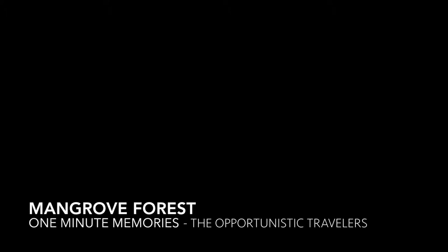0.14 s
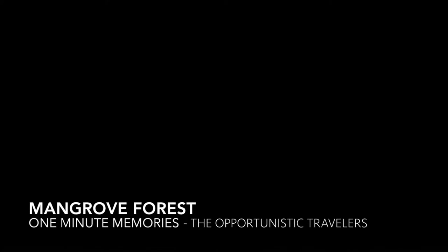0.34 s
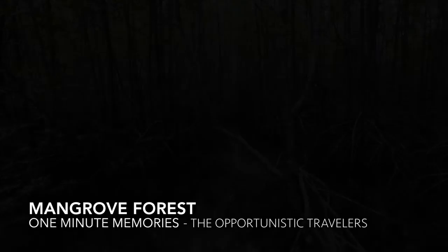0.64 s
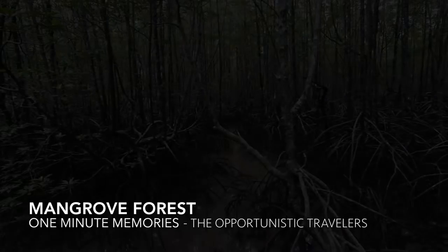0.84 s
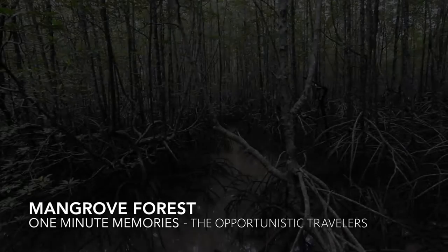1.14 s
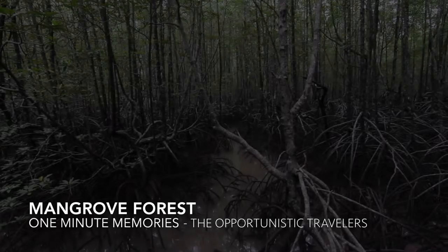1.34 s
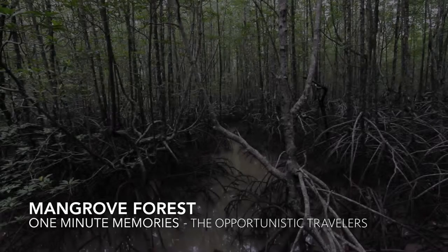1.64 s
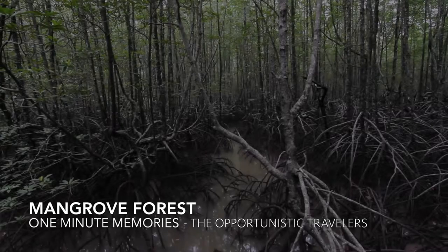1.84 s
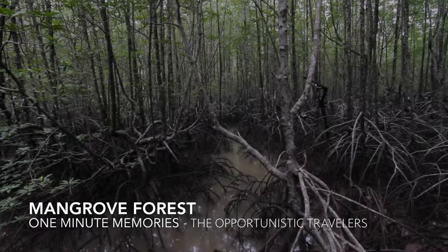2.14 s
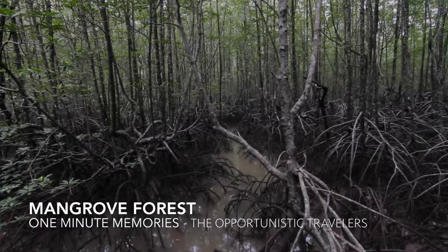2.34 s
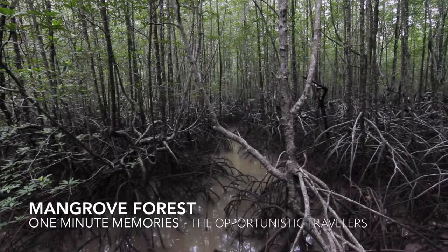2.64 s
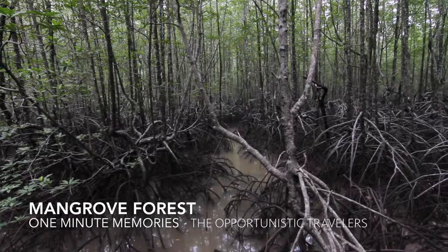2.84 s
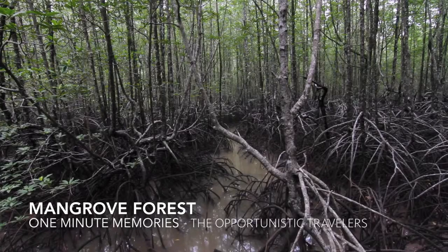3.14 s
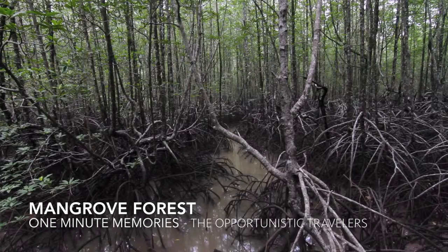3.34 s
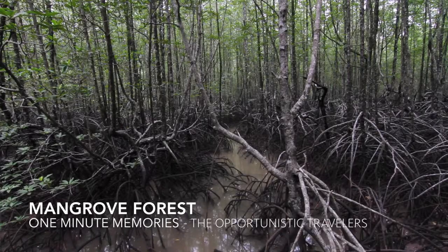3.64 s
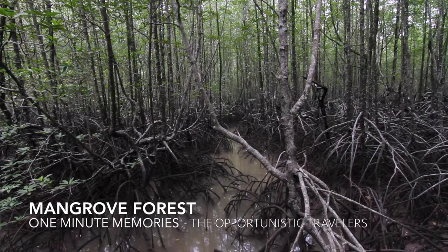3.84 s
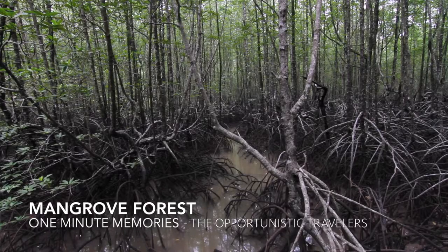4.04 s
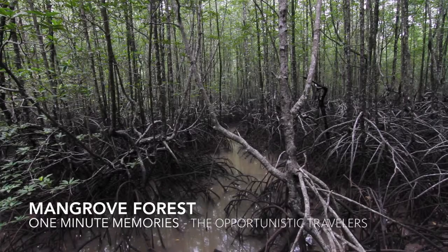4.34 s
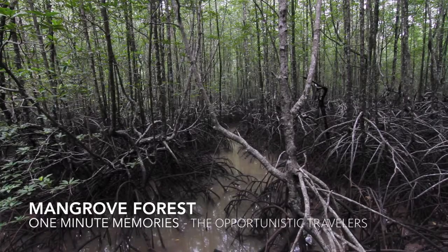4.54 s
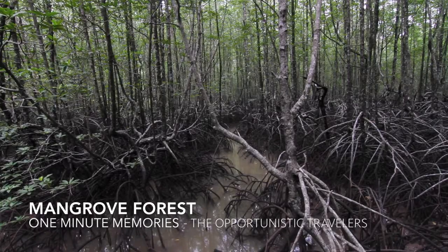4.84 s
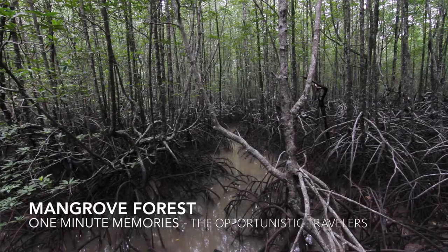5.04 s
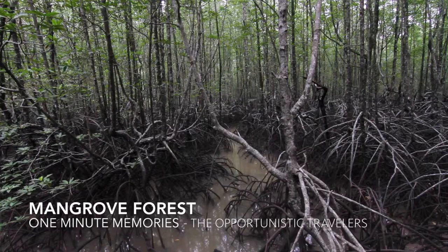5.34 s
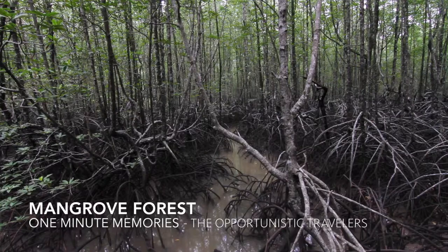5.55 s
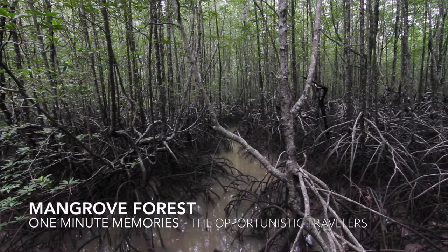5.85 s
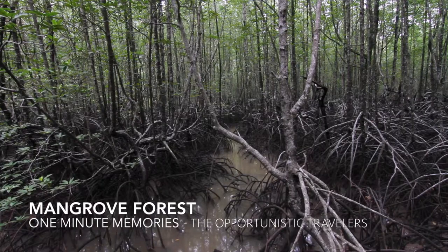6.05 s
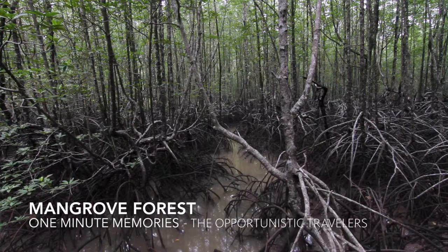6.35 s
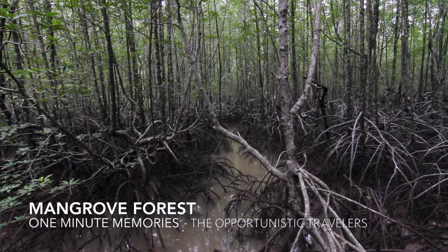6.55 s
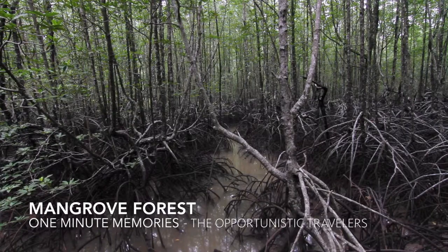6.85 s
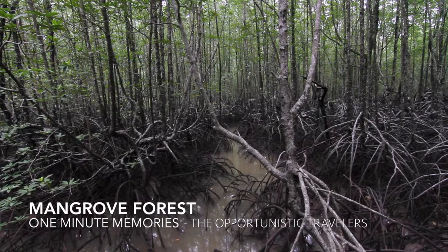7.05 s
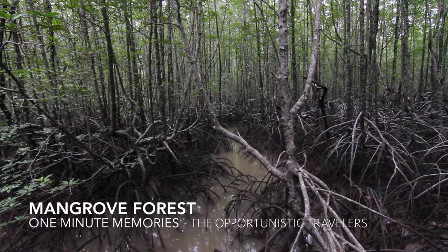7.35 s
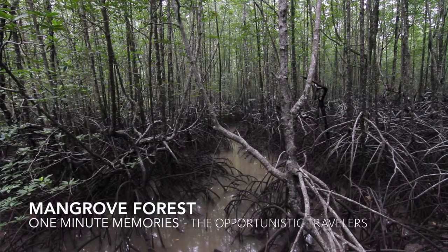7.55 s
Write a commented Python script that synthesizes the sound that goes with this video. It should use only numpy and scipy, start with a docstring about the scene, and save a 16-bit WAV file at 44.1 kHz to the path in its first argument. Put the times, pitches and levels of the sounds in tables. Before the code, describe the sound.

Outdoor insect ambience among dense trees and wet roots: a far, hissing cicada chorus with nearer groups buzzing in slightly different paces, blurred by echoes from the trunks. It fades in smoothly, one brighter close singer briefly standing out around two seconds, then stays steady. Very faint squeaks and rustles pass, a single dry snap occurs past the middle, and quiet handling thuds come last. The stationary microphone also catches weak low air rumble.

```python
"""Cicadas drone in a mangrove swamp; the sound fades in over a little more than two seconds.
Each near group is a few click trains at almost the same, slowly rising pace, ringing in the insects' bodies.
Scattered singers and one close one are made the same way; the far chorus is noise in a shrill band near 5 kHz.
Underneath lie a rumble of filtered noise, small squeaks, rustles and microphone handling rumbles made of
noise bursts, one snap, and soft bumps on the microphone."""
import sys
import numpy as np
from scipy import signal
from scipy.fft import rfft, irfft
from scipy.io import wavfile

SR = 44100
rng = np.random.default_rng(int(sys.argv[2]) if len(sys.argv) > 2 else 0)


def output_pcm(signal):
    """Save a mono or channel-first signal as 16-bit PCM at the path in sys.argv[1].

    Samples are clipped to [-1, 1] before scaling.
    """
    pcm = np.clip(np.atleast_2d(signal).T, -1, 1) * 32767
    wavfile.write(sys.argv[1], SR, np.round(pcm).astype(np.int16))


N = 339129
TIME = np.arange(N) / SR   # seconds
FREQS = np.fft.rfftfreq(N, 1 / SR)   # Hz


def from_db(db):
    """Turn decibels into a gain."""
    return 10 ** (np.asarray(db) / 20)


def rms_one(x):
    """Scale a sound to an average (rms) level of 1."""
    return x / np.sqrt(np.mean(x ** 2) + 1e-20)


def response(points):
    """Draw a gain for every frequency through a few points, silent beyond the outer ones."""
    hz, db = np.transpose(points)
    curve_db = np.interp(np.log(FREQS + 1), np.log(hz), db, left=-np.inf, right=-np.inf)
    return from_db(curve_db)


def coloured(x, gain):
    """Give a steady sound its tone by weighting its frequencies; its rms becomes 1."""
    return rms_one(irfft(rfft(x) * gain, N))


def drift(rate):
    """Wander by chance, in straight lines between random values drawn `rate` times a second."""
    knots = rng.standard_normal(int(N / SR * rate) + 2)
    return np.interp(TIME * rate, np.arange(len(knots)), knots)


# The tone of the distant rumble and air.
# Each row: frequency in Hz, relative strength in dB.
AIR_TONE = [(20, -13), (45, -14), (80, -10.5), (125, -2.5), (190, -.5), (255, -1), (310, 2), (450, -3.5),
            (800, -8), (1500, -13), (2500, -15.5), (4000, -14.5), (9000, -24.5), (16000, -22)]


def air():
    """A distant rumble with a faint hiss above it: filtered noise that grows very slowly."""
    start_db, rise_db_per_s = -54, 0.1731
    noise = coloured(rng.standard_normal(N), response(AIR_TONE))
    return from_db(start_db + rise_db_per_s * TIME) * noise


# Soft bumps on the microphone.
# Each row: start in seconds, top of the envelope in dB before the fade-in, pitch in Hz,
# time from the start to that top in seconds (it also sets how fast the bump dies).
MICROPHONE_BUMPS = [(1.207, -46, 65, .009), (1.335, -53, 55, .009), (4.94, -59, 55, .012),
                    (7.232, -49, 75, .008), (7.428, -43, 60, .012), (7.469, -42.5, 104, .011),
                    (7.515, -49, 85, .009)]


def bumps():
    """Each nudge swings the microphone briefly: a low sine that swells and dies."""
    out = np.zeros(N)
    for start_s, db, hz, decay_s in MICROPHONE_BUMPS:
        age = np.maximum(TIME - start_s, 0)
        swing = np.sin(2 * np.pi * hz * age)
        envelope = age / decay_s * np.exp((1 - (age / decay_s) ** 2) / 2)
        out += from_db(db) * swing * envelope
    return out


# Small noises: squeaks, rustles and low microphone handling rumbles.
# Each row: start in seconds, level in dB before the envelope and fade-in, centre in Hz, width in Hz,
# rise in seconds, decay in seconds. Band edges outside 50 Hz to 0.45 SR are pulled in.
SMALL_NOISES = [(1.32, -53, 1205, 160, .01, 0.045), (1.325, -60, 2450, 500, .012, .035),
                (1.325, -58.5, 12500, 6000, .01, .025), (3.797, -52, 3300, 3200, 0.016, 0.033),
                (3.793, -54.5, 12500, 4500, .02, .03), (6.618, -56, 2200, 1400, .021, .06),
                (6.635, -58, 2900, 900, 0.044, 0.14), (7.18, -59, 90, 120, .054, .14),
                (7.42, -51.5, 89, 120, .06, .07), (7.36, -60, 260, 230, .32, .2)]


def small_noises():
    """Brief squeaks, rustles and low handling rumbles: a band of noise that swells and dies."""
    out = np.zeros(N)
    for start_s, db, hz, width, rise_s, decay_s in SMALL_NOISES:
        edges = np.clip([hz - width / 2, hz + width / 2], 50, .45 * SR)
        band = signal.butter(2, edges, "band", fs=SR, output="sos")
        noise = rms_one(signal.sosfilt(band, rng.standard_normal(N)))
        age = np.maximum(TIME - start_s, 0)
        swell = np.minimum(age / rise_s, 1)
        fall = np.exp(-np.maximum(age - rise_s, 0) / decay_s)
        out += from_db(db) * noise * swell * fall
    return out


# One dry snap.
# The only row: start in seconds, peak in dB before the final low-pass.
DRY_SNAP = (5.1293, -22.8)


def snap(ring_hz=2800, quality=0.73, thud=.12, thud_hz=700):
    """A heavily damped click with a little body, as from a shrimp in the mud."""
    start_s, db = DRY_SNAP
    kick = np.arange(N) == round(start_s * SR)
    ring = signal.lfilter(*signal.iirpeak(ring_hz, quality, fs=SR), kick)
    low_body = signal.lfilter(*signal.butter(1, thud_hz, fs=SR), kick)
    click = ring + thud * low_body
    return from_db(db) * click / np.abs(click).max()


# The main resonance of a cicada's abdomen.
# Each row: frequency in Hz, relative strength in dB.
ABDOMEN_TONE = [(3000, -45), (3800, -44.5), (4120, -33.5), (4300, -22), (4450, -16), (4750, -6),
                (4900, -2.5), (5050, -0.5), (5290, -1), (5420, -5), (5660, -6), (5980, -19), (6250, -23),
                (6550, -32)]
# The weaker resonances above it.
# Each row: frequency in Hz, strength in dB before the setting for distance.
OVERTONE_TONE = [(6000, -45), (6650, -28), (7000, -28.5), (7250, -27.5), (8250, -25.5), (8900, -31),
                 (9400, -34), (9850, -30.5), (10550, -31), (11400, -43.5), (12500, -43), (13400, -50),
                 (15500, -52)]


def cicada_body(overtones_db):
    """The body's resonances; leaves soak up treble, so overtones are set weaker with distance."""
    return np.hypot(response(ABDOMEN_TONE), from_db(overtones_db) * response(OVERTONE_TONE))


def far_chorus():
    """Far cicadas merge into one noise, and only the body resonances remain."""
    level_db, overtones_db = -31.5, -5
    return from_db(level_db) * coloured(rng.standard_normal(N), cicada_body(overtones_db))


def clicks_at(cycles):
    """Click each time the cycle count passes a whole number, shared between two samples."""
    at = np.flatnonzero(np.diff(np.floor(cycles)) > 0)
    late = (np.floor(cycles[at + 1]) - cycles[at]) / (cycles[at + 1] - cycles[at])
    out = np.zeros(N)
    out[at], out[at + 1] = 1 - late, late
    return out


def among_trunks(x, t60=0.75, direct=0.16):
    """Countless trunks scatter the sound into a dense tail: decaying noise, cut off at half a second."""
    t = TIME[:SR // 2]
    echoes = rng.standard_normal(len(t)) * from_db(-60 * t / t60)   # t60: seconds to fall by 60 dB
    tail = signal.fftconvolve(x, echoes / np.linalg.norm(echoes))[:N]
    return direct * x + tail


def cicada_group(rate, body, spread, count, rebound=.5):
    """Tymbals (drum skins) buckle, then spring back half a cycle later with opposite sign; rms 1."""
    wander, jitter = .0006, .002   # slow and fast unsteadiness, as shares of the pace
    sound = np.zeros(N)
    # each insect keeps its own pace, somewhere within the spread of its group
    offsets = spread * (2 * (np.arange(count) + rng.random(count)) / count - 1)
    for offset in offsets:
        own_rate = rate * (1 + offset + wander * drift(5) + jitter * drift(90))
        cycles = rng.random() + np.cumsum(own_rate) / SR
        uneven = rng.normal(0, .006)   # in cycles: the rebound is not quite halfway
        buckling = clicks_at(cycles)
        springing_back = clicks_at(cycles + .5 + uneven)
        # each has its own perch, so its own echoes
        sound += among_trunks(buckling - rebound * springing_back)
    return coloured(sound, body)


def scattered_cicadas():
    """Singers at widely different paces fill the gaps between the groups' lines."""
    start_hz, hz_per_s, level_db, overtones_db = 245.26, 1.63, -33, 1.5
    rate = start_hz + hz_per_s * TIME
    buzz = cicada_group(rate, cicada_body(overtones_db), spread=.12, count=10, rebound=0.53)
    return from_db(level_db) * buzz


def lone_cicada():
    """One bright, close singer rises, holds for about a second and a half and dies away."""
    start_hz, hz_per_s, overtones_db = 246.5, .72, 8
    hold_from_s, hold_to_s, level_db, edge_db_per_s = 1.5, 2.94, -45, 25
    outside_s = np.abs(TIME - np.clip(TIME, hold_from_s, hold_to_s))
    rate = start_hz + hz_per_s * TIME
    buzz = cicada_group(rate, cicada_body(overtones_db), spread=0, count=1, rebound=.1)
    return from_db(level_db - edge_db_per_s * outside_s) * buzz


# Near groups of cicadas.
# Each row: pace at the start in cycles per second, speed-up in cycles per second each second,
# spread of pace as a share, rebound strength from 0 to 1, top level in dB before the fade-in,
# loudest moment in seconds, width of the swell in seconds.
NEAR_GROUPS = [(241.1, 1.63, .0038, 0.63, -33.5, 7.34, 7.6), (250.6, 1.15, .005, 0.85, -33, 0.63, 3.5),
               (262.7, 1.03, .009, 0.83, -37, 3.8, 8.5)]


def near_groups():
    """Five insects a group click at nearly one pace, speed up steadily and follow one broad swell."""
    swell_db, overtones_db = 12, 4   # swell_db: the most a group can sink below its top level
    out, body = np.zeros(N), cicada_body(overtones_db)
    for start_hz, hz_per_s, spread, rebound, top_db, loudest_s, width_s in NEAR_GROUPS:
        arch = np.exp(-((TIME - loudest_s) / width_s) ** 2)
        rate = start_hz + hz_per_s * TIME
        buzz = cicada_group(rate, body, spread, count=5, rebound=rebound)
        out += from_db(top_db - swell_db * (1 - arch)) * buzz
    return out


def scene():
    """The cicadas sing over the quiet swamp."""
    cicadas = near_groups() + scattered_cicadas() + lone_cicada() + far_chorus()
    return (cicadas + air() + small_noises() + snap() + bumps())[None]


def record(dry):
    """The level fades in and the highest treble is cut."""
    fade_s, fade_power, start_db, cutoff_hz = 2.256, 1.42, -37.5, 15700
    fade = np.minimum(from_db(start_db) + (TIME / fade_s) ** fade_power, 1)
    low_pass = signal.ellip(12, .1, 80, cutoff_hz, fs=SR, output="sos")
    return signal.sosfilt(low_pass, dry * fade)


dry = scene()
out = record(dry)
output_pcm(out)
```